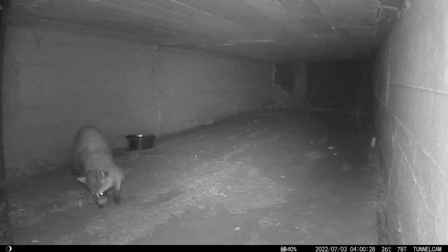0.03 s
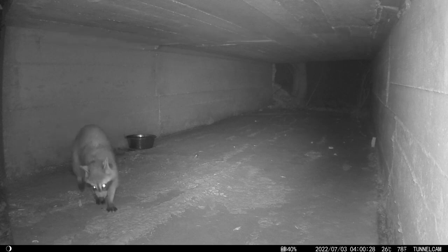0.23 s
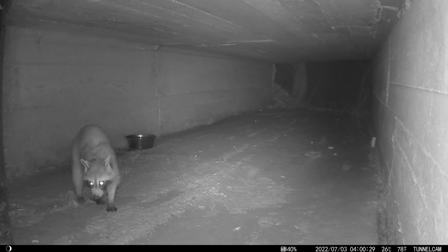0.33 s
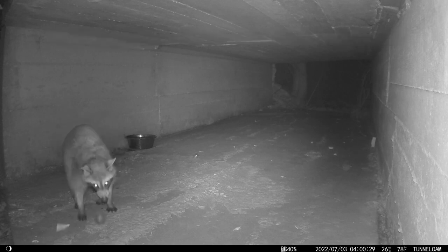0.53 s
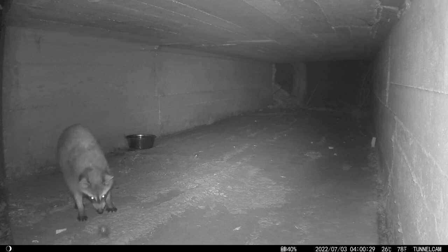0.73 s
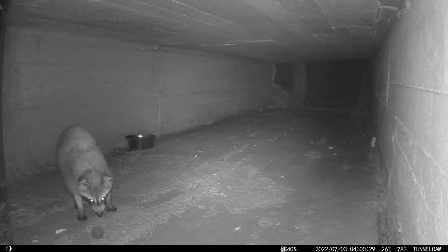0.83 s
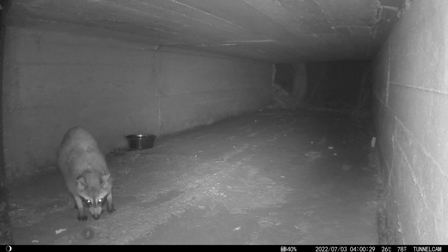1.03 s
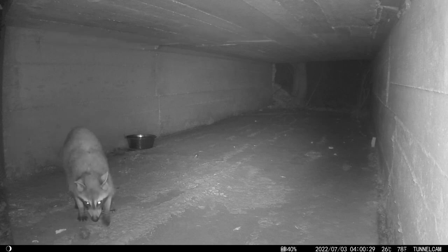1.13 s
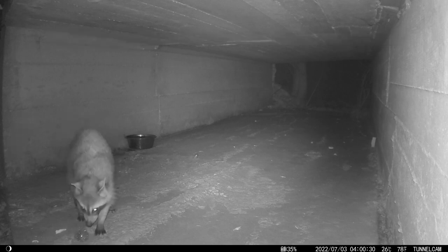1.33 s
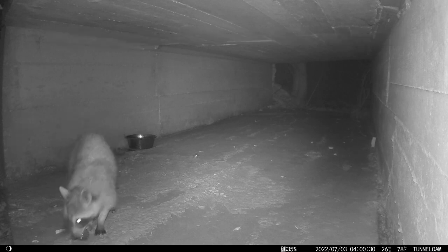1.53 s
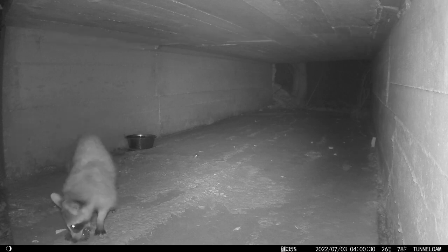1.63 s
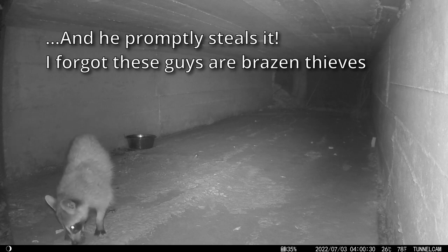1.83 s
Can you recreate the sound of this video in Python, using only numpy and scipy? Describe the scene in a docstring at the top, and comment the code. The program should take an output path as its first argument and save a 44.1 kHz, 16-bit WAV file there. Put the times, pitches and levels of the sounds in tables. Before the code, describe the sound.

A short, harsh raccoon squeal bursts out right after a thinner whistle, with low body thuds and then light paw pats. The concrete tunnel echoes briefly, and a small microphone's faint hum and whine continue throughout, on the left only.

```python
"""In a concrete tunnel a paw pats the floor, then a raccoon's vocal folds give a thin, arching whistle
that breaks into a rasp. A louder, harsh squeal follows at once, over the low thuds of its shifting body.
Its paws then pat and scuff, and near the end it faintly brushes the floor. The tunnel rings briefly after
each call and pat. A small mono camera adds low hum and narrow whine throughout; all is on the left."""
import sys
import numpy as np
from scipy import signal
from scipy.fft import rfft, irfft, next_fast_len
from scipy.io import wavfile
from scipy.ndimage import uniform_filter1d, map_coordinates

SR = 44100
rng = np.random.default_rng(int(sys.argv[2]) if len(sys.argv) > 2 else 0)


def transcribe(signal):
    """Save signal, clipped to [-1, 1], as a 16-bit WAV file at the path in sys.argv[1]."""
    frames = np.atleast_2d(signal).T
    limited = np.clip(frames, -1, 1)
    pcm = np.round(limited * 32767).astype(np.int16)
    wavfile.write(sys.argv[1], SR, pcm)


N = 83790

# squeal gesture: t/s, f/Hz, level/dB, harshness (1 = full), period doubling (0-1)
SQUEAL_GESTURE = [(.302, 1060, -55, 0.3, 0.02), (.313, 1279, -24, 0.35, 0.1),
                  (.327, 1389, -20.5, 0.28, 0.05), (.335, 1504, -28, 0.5, .1), (.349, 1651, -21, .42, 0.2),
                  (.363, 1731, -25, 0.54, .9), (.382, 1683, -20, 0.54, 0.8),
                  (.398, 1668, -21.5, 0.75, 0.98), (.400, 2297, -17.5, 0.52, .1),
                  (.409, 2292, -12, 0.68, 0.01), (.411, 2004, -13.5, 0.85, 0), (.418, 1721, -16, 1.0, .2),
                  (.4205, 1532, -9, .7, .15), (.424, 1400, -9, 0.45, .15), (.428, 1027, -18.5, 0.75, 0.4),
                  (.442, 760, -26.5, 0.3, .1)]
# throat and mouth resonances of the squeal: f/Hz, level/dB
SQUEAL_FORMANTS = [(300, -28.5), (750, -14.5), (1050, -8.5), (1400, 4.5), (1700, -1), (1950, -10),
                   (2300, 2.5), (2650, 0.5), (3000, -17), (3400, -2.5), (4000, 2.5), (4650, -0.5),
                   (5350, -10), (6000, 0), (6800, 10), (7500, -6), (9500, -10.5), (10900, 1.5),
                   (12200, -14), (13200, -48)]
def squeal():
    """The loud second call: the folds slip into period doubling, then the pitch leaps and dives."""
    return voice(SQUEAL_GESTURE, SQUEAL_FORMANTS, soft_db_per_octave=-12.5, blur_rad=.17)


# whistle gesture: t/s, f/Hz, level/dB, harshness (1 = full)
WHISTLE_GESTURE = [(.122, 620, -57.5, .3), (.138, 1000, -51, .7), (.146, 1220, -43, .75),
                   (.157, 1330, -39, 0.47), (.164, 1900, -46, 0.81), (.171, 2201, -42, 0.76),
                   (.177, 2720, -33.5, .3), (.19, 3110, -36, .28), (.208, 3336, -37, 0.5),
                   (.221, 3140, -33, .42), (.231, 2705, -22.5, 0.42), (.24, 2160, -24, 0.95),
                   (.246, 1620, -28, 1.09), (.254, 1390, -25, .9), (.26, 1180, -29, 0.6),
                   (.272, 912.7, -55, 0.3)]
# throat and mouth resonances of the whistle: f/Hz, level/dB
WHISTLE_FORMANTS = [(300, -26.5), (750, -16.5), (1250, 2), (1600, -3.5), (2100, -12), (2650, -3),
                    (3400, -3.5), (4200, 11), (4650, 9), (5300, -7), (6100, 6.5), (7300, 4), (9500, -6.5),
                    (10400, -5.5), (12200, -12.5), (13200, -33)]
def whistle():
    """The thin first call: it arches up and turns to rasp on the way down."""
    return voice(WHISTLE_GESTURE, WHISTLE_FORMANTS, soft_db_per_octave=-20, blur_rad=.38)


# rough air at the folds: f/Hz, level/dB
RASP_EQ = [(500, -2), (1500, -9.5), (4000, 1.5), (7000, -3), (11000, 0)]
# thin hiss through the teeth: f/Hz, level/dB
BREATH_EQ = [(2000, -13.5), (8500, -3.5), (15000, -5)]
def voice(gesture, formants, soft_db_per_octave, blur_rad):
    """Vocal folds sound through the throat; harshness brightens, shakes and roughens the tone."""
    t = np.arange(N) / SR
    pitch, level_db, harsh, *doubling = curves(gesture)
    waver = .006 * wobble(260)
    jitter = .03 * harsh * wobble(1500)
    phase = 2 * np.pi * np.cumsum(pitch * (1 + waver + jitter)) / SR
    tilt_db = soft_db_per_octave * (1 - harsh)  # flat at full harshness

    def partial(k):
        """One shimmering multiple of the pitch; the higher it is, the more its phase smears."""
        shimmer_db = 3 * np.sqrt(harsh) * wobble(400)
        gain = amp(tilt_db * np.log2(max(k, 1)) + shimmer_db)
        smear = blur_rad * (k - 1) * wobble(600) + rng.uniform(0, 2 * np.pi)
        high_cut = 1 / (1 + (k * pitch / 7500) ** 10)
        return gain * high_cut * np.sin(k * phase + smear)

    folds = sum(partial(k) for k in range(1, 10))
    if doubling:  # half-harmonics, the lowest one weaker
        halves = amp(-20.5) * partial(.5) + sum(partial(k + .5) for k in range(1, 5))
        folds += amp(6) * doubling[0] * halves
    tone = amp(-2 * harsh ** 2) * folds  # ducks as the rasp takes over
    pulsed_air = unit(noise(RASP_EQ) * (1 + np.cos(phase)))
    rasp = harsh ** 1.5 * pulsed_air
    sounding = (t > gesture[0][0]) & (t < gesture[-1][0])
    gate = uniform_filter1d(sounding.astype(float), size=128)
    source = (tone + rasp) * amp(level_db) * gate
    breath = amp(-69) * gate * noise(BREATH_EQ)
    return filtered(source, lambda hz: amp(along(formants, hz))) + breath


# paw hits: t/s, pad level/dB, claw level/dB, 60 dB decay/s
PAW_HITS = [(0.012, -56, -64.5, 0.049), (0.537, -55, -33.5, 0.03), (0.606, -36, -45, 0.043),
            (.618, -48.5, -38.5, 0.014), (0.649, -48.5, -73, 0.069), (0.671, -48, -51, 0.059),
            (0.732, -54, -64, 0.0644), (0.815, -44.5, -47, 0.015), (0.907, -51, -63, 0.054),
            (1.853, -60, -69.5, 0.16)]
# dull pad: f/Hz, level/dB
PAD_EQ = [(60, -11), (200, -5.5), (330, 0.5), (430, -3.5), (560, -1.5), (800, -5), (1400, 0.5), (2500, -16),
          (5000, -25), (12000, -43)]
# bright claw: f/Hz, level/dB
CLAW_EQ = [(500, -20), (2500, 2.5), (4500, -3), (7000, 0.5), (8500, -7), (10500, -11), (13000, -24)]
# snout and claws brushing the floor: t/s, level/dB
BRUSH_FADE = [(1.7, -83.5), (1.78, -77.5), (1.9, -72)]
def paws(attack_s=.0007):
    """Each pat layers a soft pad with a claw scratch; a faint brushing swells at the end."""
    floor = amp(curves(BRUSH_FADE)[0]) * noise(CLAW_EQ)
    for start, pad_db, claw_db, t60 in PAW_HITS:
        age = np.maximum(np.arange(N) / SR - start, 0)
        envelope = (1 - np.exp(-age / attack_s)) * amp(-60 * age / t60)
        floor += envelope * (amp(pad_db) * noise(PAD_EQ) + amp(claw_db) * noise(CLAW_EQ))
    return floor


# swell of the body's movement: t/s, level/dB
SHUFFLE_FADE = [(.1, -71.5), (.27, -53.5), (.42, -45.5), (.6, -51.5), (.68, -67), (.9, -76)]
# weight of the body: f/Hz, level/dB
SHUFFLE_EQ = [(20, -18.5), (60, -9.5), (115, 3), (175, 1.5), (230, -16), (400, -16), (900, -32)]
def shuffle():
    """Low thudding while the animal jerks up and steps."""
    return amp(curves(SHUFFLE_FADE)[0]) * noise(SHUFFLE_EQ)


# early reflections: delay t/s, level/dB
WALL_TAPS = [(.0013, -21.5), (.0032, -16), (.0093, -11.5)]
def near_walls(x):
    """The direct sound plus copies off the floor and nearest walls, which comb the gliding pitch."""
    return filtered(x, lambda hz: 1 + sum(amp(db) * np.exp(-2j * np.pi * hz * s) for s, db in WALL_TAPS))


# reverb time: f/Hz, 60 dB decay/s
TUNNEL_DECAY = [(100, .5), (700, 0.43), (1500, 0.26), (2600, 0.26), (4500, 0.36), (7000, 0.18),
                (11000, 0.24)]
# one dip and the narrow resonances of the tunnel: f/Hz, width/Hz, level/dB
TUNNEL_MODES = [(1370, 170, -7.5), (1547, 55, 5.5), (1663, 40, 5), (2524, 18, 9.5), (2715, 24, 13),
                (6530, 33, 8.5)]
def tunnel(x, predelay_s=.0029, build_s=.008):
    """Concrete walls answer within milliseconds; some pitches ring out and the treble dies first."""
    def ringing(hz):
        """A bell-shaped boost or cut at each mode."""
        return 1 + sum((amp(db) - 1) * 1j * hz * width / (centre ** 2 - hz ** 2 + 1j * hz * width)
                       for centre, width, db in TUNNEL_MODES)

    hz, t, spectrum = signal.stft(rng.standard_normal(SR), SR, nperseg=256)
    decay = amp(-60 * t / along(TUNNEL_DECAY, hz)[:, None])
    tail = signal.istft(spectrum * decay, SR, nperseg=256)[1]
    age = np.maximum(np.arange(len(tail)) / SR - predelay_s, 0)
    tail *= 1 - np.exp(-age / build_s)
    wet = signal.fftconvolve(x, tail / np.linalg.norm(tail))[:N]
    return filtered(wet, ringing)


# hum tones: f/Hz, level/dB
HUM_TONES = [(57, -65), (116, -59.5)]
# whine bands: f/Hz, half width/Hz, level/dB
WHINE_BANDS = [(3885, 170, -61), (5480, 160, -79), (3120, 120, -80.5), (1320, 30, -83.5), (1050, 25, -80)]
# low rumble: f/Hz, level/dB
RUMBLE_EQ = [(12, -13.5), (28, -2.5), (55, 1.5), (82, -4.5), (115, -4.5), (143, -8), (169, -7.5),
             (195, -16.5), (330, -28), (600, -45), (1500, -86)]
# broad hiss: f/Hz, level/dB
HISS_EQ = [(100, 3.5), (400, 0.5), (1100, 2), (1600, -1), (2550, -11), (3300, -7.5), (4700, -10),
           (6200, -14), (7200, -9.5), (12000, -15), (13000, -18), (15000, -20.5)]
# fader ride on the whole bed: t/s, level/dB
BED_FADE = [(.05, -4), (.3, 3), (1.2, 0), (1.55, -2)]
def electronics():
    """The camera's noise bed: wavering hum, narrow bands of whine, rumble and hiss."""
    t = np.arange(N) / SR
    hum = sum(amp(db + 2.5 * wobble(8)) * np.sin(2 * np.pi * hz * t + .9 * wobble(9))
              for hz, db in HUM_TONES)
    whine = np.zeros(N)
    for centre, width, db in WHINE_BANDS:
        band = filtered(rng.standard_normal(N), lambda hz: 1 / (1 + np.abs((hz - centre) / width) ** 2.9))
        whine += amp(db) * unit(band)
    bed = hum + whine + amp(-56) * noise(RUMBLE_EQ) + amp(-69) * noise(HISS_EQ)
    return amp(curves(BED_FADE)[0]) * bed


def amp(db):
    """Decibels to gain."""
    return 10 ** (np.asarray(db) / 20)


def unit(x):
    """Scale to rms 1."""
    return x / np.sqrt(np.mean(x ** 2) + 1e-20)


def along(points, hz):
    """Read (f/Hz, value) points at hz, on a log frequency axis."""
    f, values = np.transpose(points)
    return np.interp(np.log(hz + 1), np.log(f + 1), values)


def curves(rows):
    """One automation curve for each column after the time."""
    times, *columns = np.transpose(rows)
    return [np.interp(np.arange(N) / SR, times, column) for column in columns]


def wobble(rate):
    """A smooth random modulator, rate knots a second."""
    return map_coordinates(rng.standard_normal(8192), [np.arange(N) * rate / SR], mode="wrap")


def filtered(x, response):
    """Shape x with a frequency response."""
    size = next_fast_len(N + SR // 2)
    return irfft(rfft(x, size) * response(np.fft.rfftfreq(size, 1 / SR)), size)[..., :N]


def noise(eq):
    """Noise coloured by an EQ curve, at rms 1."""
    return unit(filtered(rng.standard_normal(N), lambda hz: amp(along(eq, hz))))


def scene():
    """Calls and paws feed the tunnel; shuffle and noise bed stay dry. Left channel only."""
    animal = whistle() + squeal() + paws()
    bed = electronics()
    left = near_walls(animal) + amp(-7.5) * tunnel(animal) + shuffle() + bed
    return np.array([left, np.zeros(N)])


def record(dry, ceiling=.9, shelf_hz=12600, shelf_db=-13, top_hz=15500):
    """The camera soft-clips the loudest peaks, dulls the highest treble and cuts off at its band limit."""
    rounded = dry / (1 + np.abs(dry / ceiling) ** 6) ** (1 / 6)
    return filtered(rounded, lambda hz: amp(shelf_db / (1 + np.exp((shelf_hz - hz) / 150))) * (hz < top_hz))


dry = scene()
out = record(dry)
transcribe(out)
```